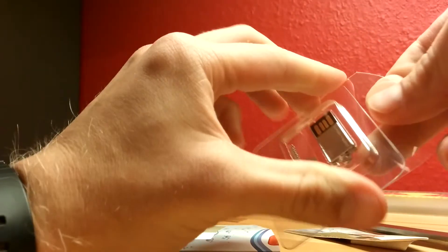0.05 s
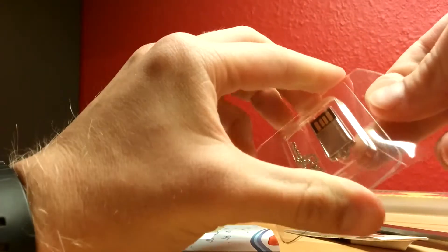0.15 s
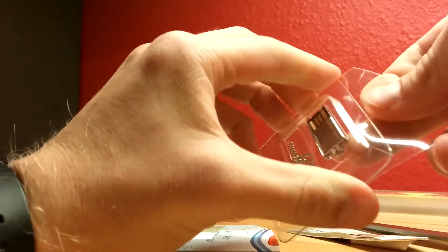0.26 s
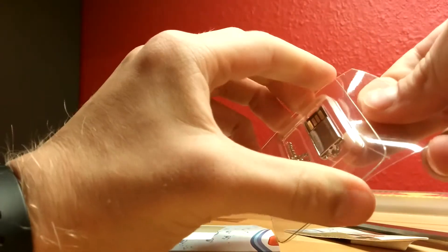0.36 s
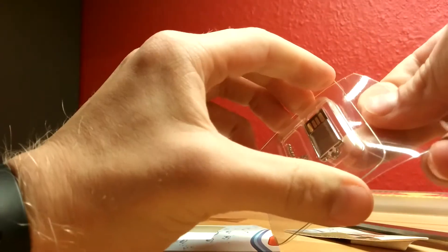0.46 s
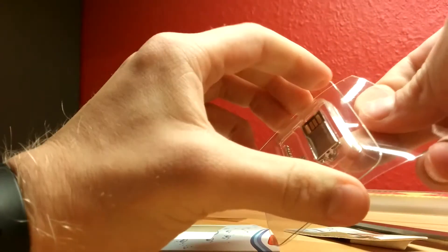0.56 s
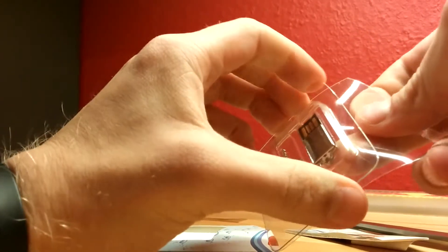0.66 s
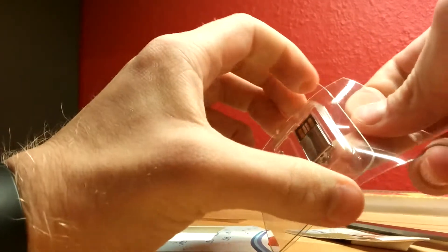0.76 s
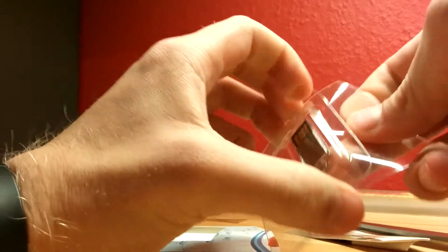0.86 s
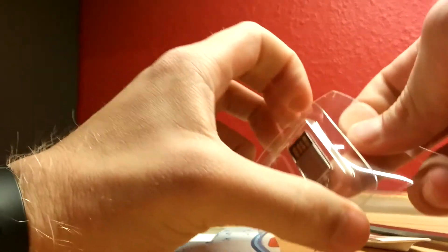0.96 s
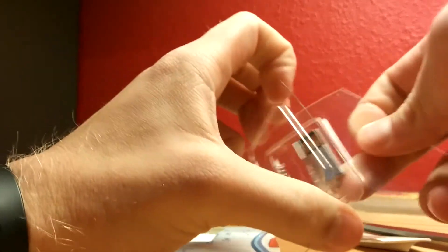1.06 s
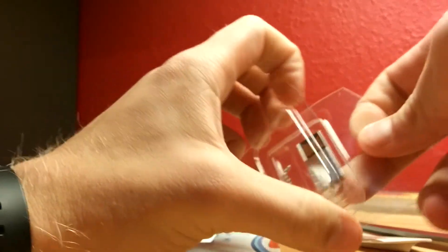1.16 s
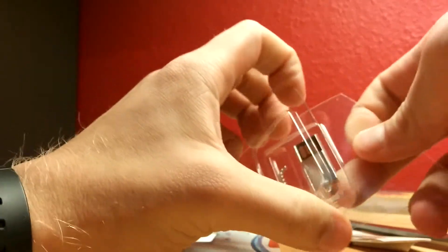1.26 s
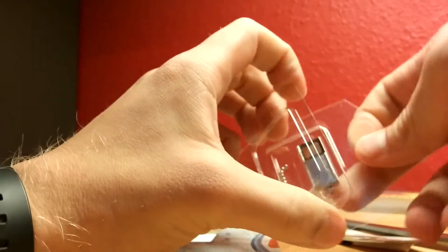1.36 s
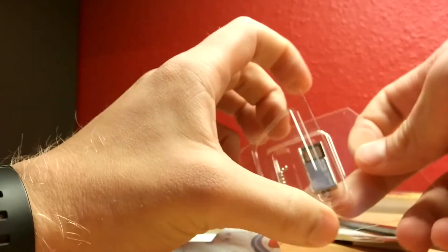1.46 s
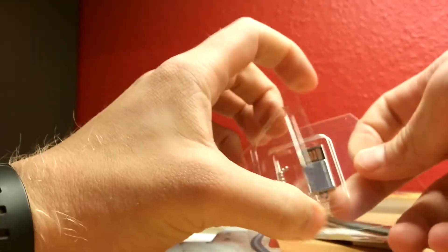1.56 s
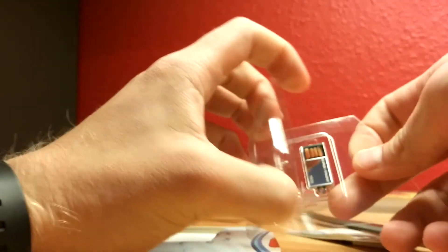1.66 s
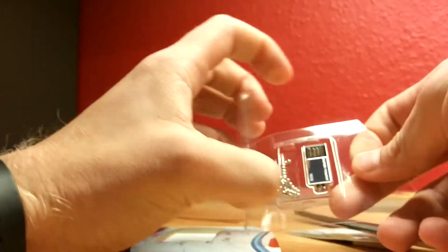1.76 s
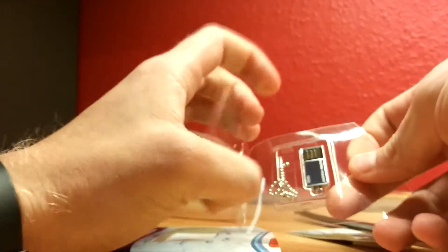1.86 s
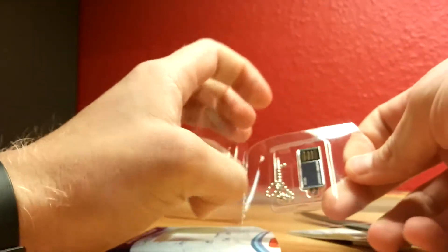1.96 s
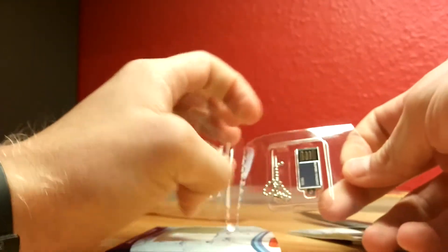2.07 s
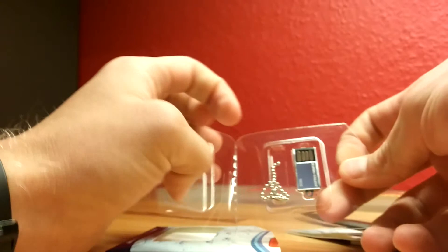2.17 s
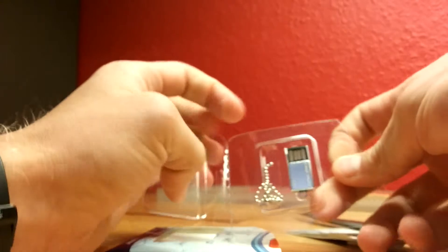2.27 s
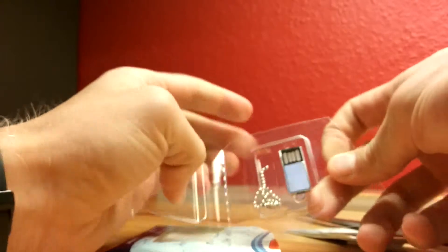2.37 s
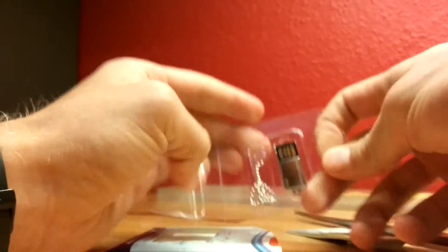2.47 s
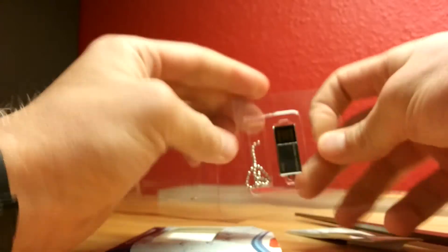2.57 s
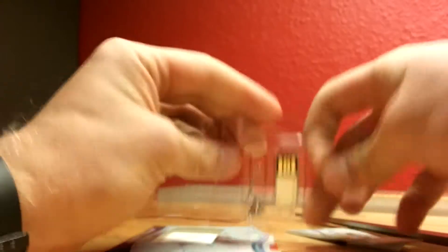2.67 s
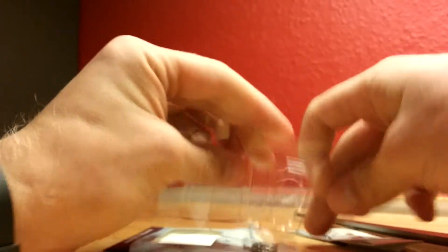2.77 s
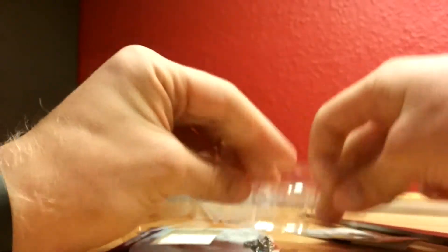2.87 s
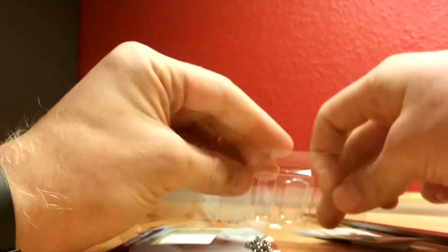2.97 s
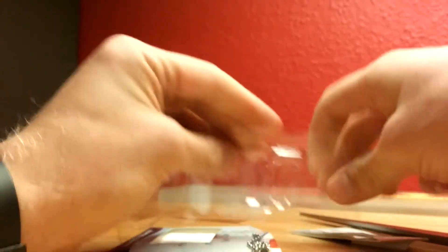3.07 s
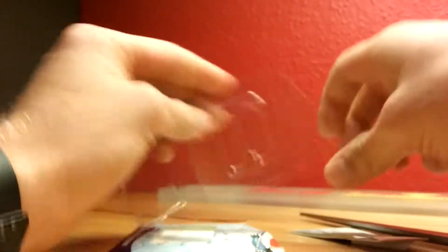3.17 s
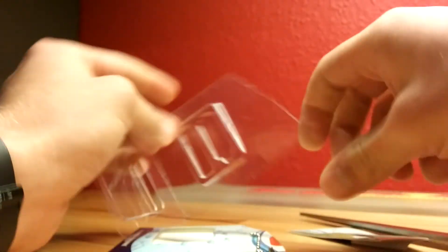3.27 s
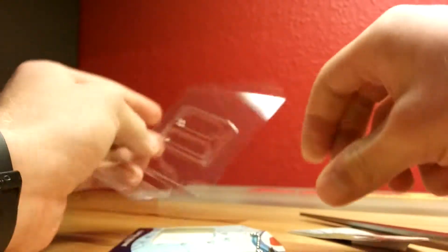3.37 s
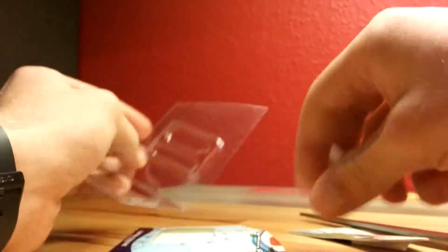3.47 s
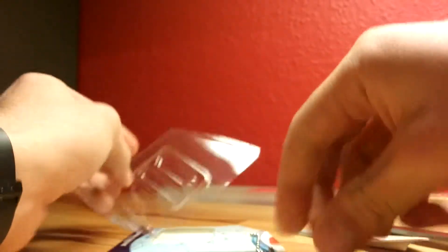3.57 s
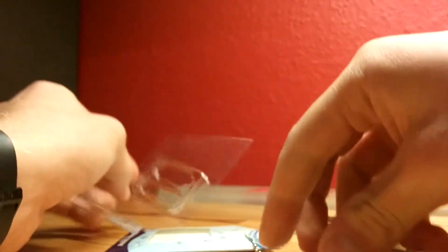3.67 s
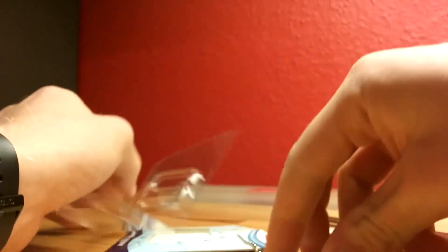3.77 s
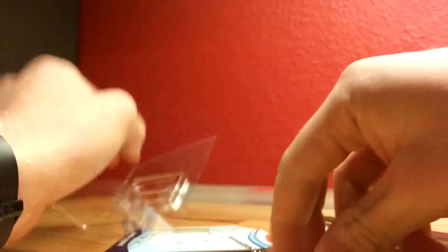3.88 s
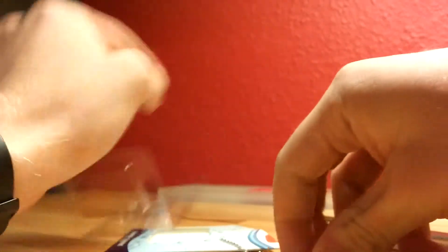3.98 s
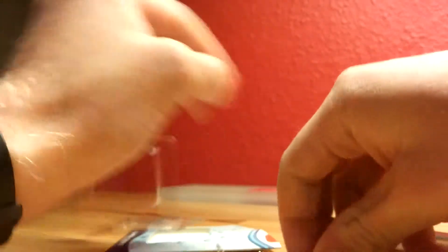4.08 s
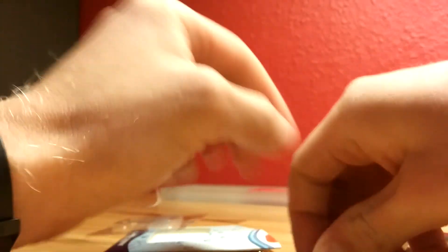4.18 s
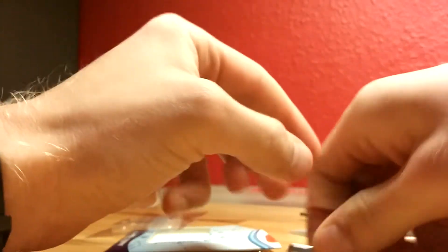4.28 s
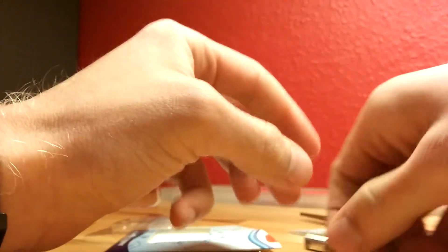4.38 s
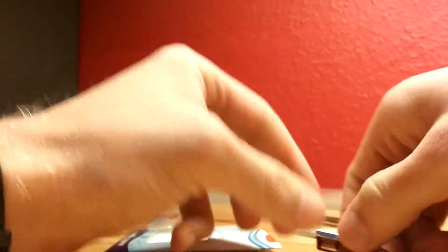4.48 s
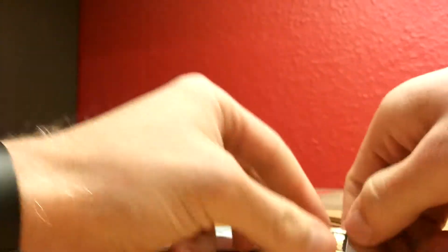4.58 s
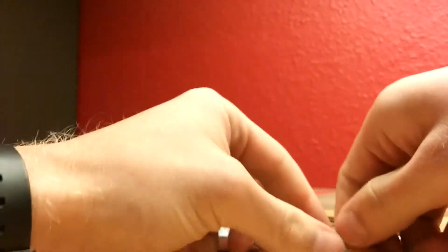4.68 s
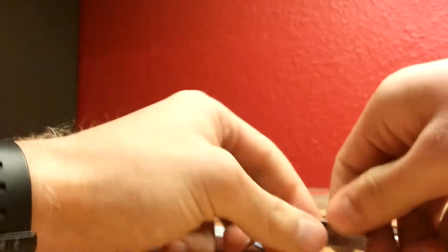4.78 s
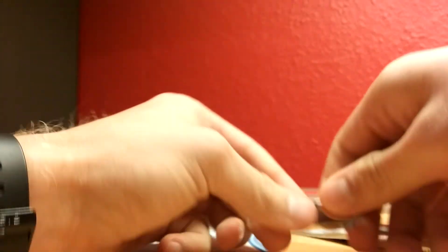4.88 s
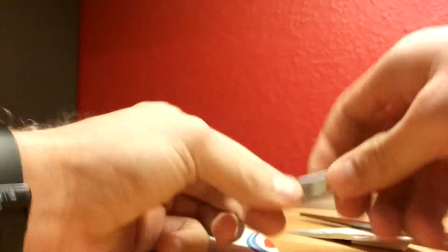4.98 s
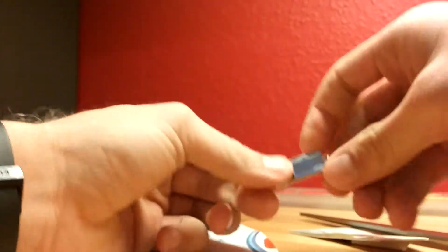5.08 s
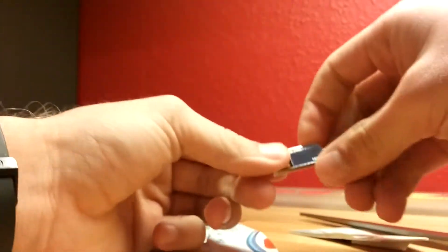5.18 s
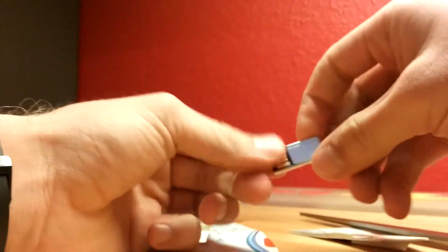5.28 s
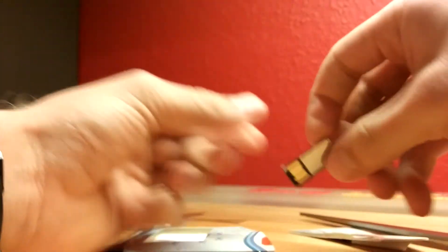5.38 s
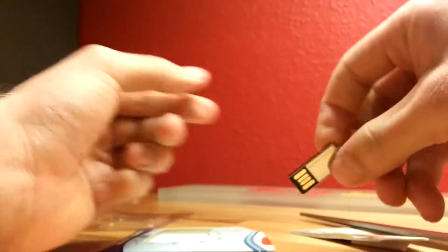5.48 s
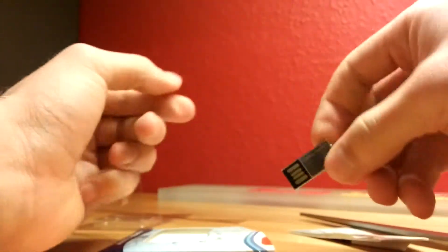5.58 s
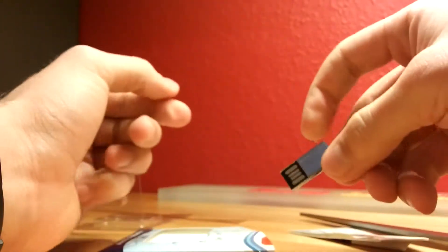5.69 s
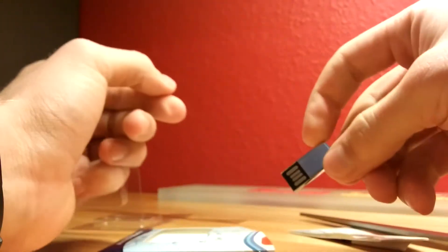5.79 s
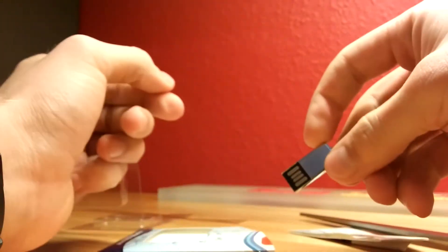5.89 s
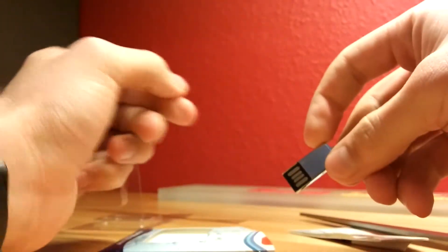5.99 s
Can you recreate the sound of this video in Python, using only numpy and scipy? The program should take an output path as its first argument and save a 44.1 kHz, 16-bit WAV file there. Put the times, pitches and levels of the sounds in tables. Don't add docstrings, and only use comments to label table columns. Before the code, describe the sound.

Close, dry plastic creaks and cracks build to a loud ripping burst, a small part rattles in the tray, then sparse rustles and clicks.

```python
import sys
import numpy as np
from scipy import signal
from scipy.fft import rfft, irfft
from scipy.io import wavfile
from scipy.ndimage import uniform_filter1d

SR = 44100
rng = np.random.default_rng(int(sys.argv[2]) if len(sys.argv) > 2 else 0)


def invert_db(x):
    u = np.asarray(x, float) / 20
    return 10 ** u


def digitize_waveform(pressure):
    field = np.atleast_2d(pressure).T
    bounded = np.clip(field, -1, 1)
    quanta = np.round(bounded * 32767).astype(np.int16)
    wavfile.write(sys.argv[1], SR, quanta)


N = 266229


def curve(points, column=1):
    rows = np.array(points, float)
    return np.interp(np.arange(N) / SR, rows[:, 0], rows[:, column])


def frequencies(size):
    return np.maximum(np.arange(size // 2 + 1) * SR / size, 1)


def colour(x, points):
    hz, db = np.transpose(points)
    shape_db = np.interp(np.log(frequencies(N)), np.log(hz), db, left=-90, right=-90)
    y = irfft(rfft(x) * invert_db(shape_db), N)
    return y / np.std(y)


def resonance(f, hz, q):
    return 1 / (1 + 1j * q * (f / hz - hz / f))


def dying(t, t60):
    return np.exp(-np.log(1000) * t / t60)


def grains(rate, spread_db, smear_s, wash):
    chance = rng.random((N, 2))
    size_db = spread_db * np.minimum(-np.log(chance[:, 1] + 1e-9), 2)
    slips = (chance[:, 0] < rate / SR) * invert_db(size_db)
    puffs = signal.lfilter([1], [1, -np.exp(-1 / (smear_s * SR))], slips)
    return rng.standard_normal(N) * (wash + puffs / np.std(puffs))


def rumble():
    drone = resonance(frequencies(N), 44.4, 5) ** 2
    y = irfft(rfft(rng.standard_normal(N)) * drone, N)
    return y / np.std(y) * invert_db(-78.5)


# (frequency [Hz], level [dB])
HISS_TONE = [(22, -32.5), (45, -11.5), (100, -13.5), (140, -17.5), (400, -21), (4000, -29), (12000, -30.5),
             (16000, -32)]


def hiss(open_db):
    return colour(rng.standard_normal(N), HISS_TONE) * invert_db(-70.5 + 0.77 * open_db)


# (time [s], level [dB])
HUM = [(0, -75), (.5, -76.5), (.95, -79.5), (1.1, -86.5), (4.4, -84), (5.05, -78), (5.3, -74), (5.5, -68.5),
       (5.72, -65.5), (5.8, -53.5), (5.86, -40), (5.92, -64.5), (6.04, -83)]


def hum():
    return np.sin(2 * np.pi * 101.5 * np.arange(N) / SR) * invert_db(curve(HUM))


GATE_SHUT_DB, GATE_RANGE_DB = -69.5, 24.5


def gate_db():
    hum_db = curve(HUM) - 7.5
    loudest_db = np.maximum(np.maximum(*grips()), hum_db)
    return np.clip(loudest_db - GATE_SHUT_DB, 0, GATE_RANGE_DB)


def room(x):
    t = np.arange(SR // 2) / SR
    tail = rng.standard_normal(len(t)) * dying(t, 0.27) * (1 - np.exp(-t / 0.00014))
    tail = signal.lfilter([1], [1, -.35], tail)
    return signal.fftconvolve(x, tail / np.linalg.norm(tail))[:N] * invert_db(-11)


DIE_AWAY_S = [.165, 1.249, 1.304, 1.72, 2.09, 2.358, 2.53, 3.466, 3.814, 4.211, 5.621, 5.885]
DIE_AWAY_MS = 29
GATE_KNEE_DB, GATE_RATIO, SILENT_DB = -54, 1.4, -84


def squeeze_db(rows):
    ms = np.arange(0, N / SR * 1000, .25)
    db = np.full(len(ms), -200.)
    for s, peak_db, rise_ms, fall_ms in rows:
        die_away_s = min((end for end in DIE_AWAY_S if end > s), default=N / SR)
        late = ms - s * 1000
        free = np.maximum(ms - 1000 * die_away_s, 0)
        drop_db = 10 * np.maximum(late / fall_ms, -late / rise_ms) + 10 * free / DIE_AWAY_MS
        db = np.maximum(db, peak_db - drop_db)
    below_knee_db = np.maximum(GATE_KNEE_DB - db, 0)
    passed_db = np.maximum(db - (GATE_RATIO - 1) * below_knee_db, SILENT_DB)
    return np.interp(np.arange(N) / SR * 1000, ms, passed_db)


# (peak time [s], crackle level [dB],
# flexing over crackle [dB], rise [ms per 10 dB], fall [ms per 10 dB])
SQUEEZES = [(0, -38.5, -8, 7.5, 19), (.06, -35, -1.5, 6, 28), (.086, -36, -3, 6, 56),
            (1.107, -18.5, -17, 5.5, 63), (1.203, -25, -4.5, 32, 27), (1.297, -50, 3, 28, 22),
            (1.459, -34.5, -12.5, 3, 11), (1.572, -48.5, 1, 10.5, 19), (1.666, -43.5, 2.5, 6, 49),
            (1.698, -37, 4, 20, 16), (1.812, -35.5, 4.5, 21, 11), (1.888, -35, 3.5, 14, 32),
            (1.928, -30.5, 5, 31.5, 73), (2.209, -24, -9, 4, 19), (2.269, -37, 14, 7.5, 5),
            (2.315, -25.5, -4, 25, 18), (2.446, -51.5, 2.5, 7.5, 40), (2.478, -50.5, 4, 20, 39),
            (2.572, -44, -4, 8.5, 14), (2.596, -43.5, -3.5, 22, 18), (2.674, -24, 7, 7.5, 9),
            (2.7, -26.5, -0.5, 18, 18),
            (2.777, -30, 4, 38, 9), (2.806, -15, -5.5, 16.5, 16), (2.852, -17, -16.5, 16, 43.5),
           (2.891, -16, 6, 6, 40.5), (2.973, -10, -1, 14, 33.5), (3.029, -16.5, 2.5, 12.5, 20.5),
           (3.099, -24.5, 6.5, 36, 63), (3.169, -29, 3, 68, 28), (3.237, -28, -2.5, 42, 91),
           (3.323, -38, 4.5, 38.5, 40), (3.377, -31, -8, 40, 48), (3.418, -31, 2, 28, 19.5),
           (3.694, -40, -7.5, 0.5, 62), (3.733, -22.5, -16, 8.5, 12.5), (3.777, -35.5, -5, 50, 67),
           (3.811, -46, -8, 62, 29), (3.917, -55, -6, 6.5, 58), (3.958, -40.5, 5.5, 10, 60),
           (4.005, -32.5, 7.5, 23, 36.5), (4.119, -45, 2, 82, 60), (4.191, -32, -4, 77, 36),
           (4.278, -58, 8.5, 12, 12),
            (1.657, -54, -3, 6.5, 60), (1.745, -52, 7.5, 42, 19), (1.772, -53, 8, 6, 40),
           (1.858, -56, 0, 4, 80), (3.868, -58, -4, 3, 101), (3.912, -51, 2, 3.5, 100),
           (3.952, -46, -4, 5, 70), (5.492, -36.5, 1, 4, 15), (5.529, -33, -7, 6.5, 40),
           (5.543, -33.5, -5, 12, 66), (5.603, -48, -6, 60, 28), (5.657, -61, -3, 12, 25)]


def grips():
    rows = SQUEEZES
    crackle_rows = [(s, db, rise, fall) for s, db, _, rise, fall in rows]
    flex_rows = [(s, db + flex_db, rise, fall) for s, db, flex_db, rise, fall in rows]
    return squeeze_db(crackle_rows), squeeze_db(flex_rows)


# (frequency [Hz], level [dB per Hz])
CRACKLE_TONE = [(1800, -27.5), (2500, 0), (3400, 2.5), (4300, 3), (5300, -5), (6200, -31.5)]
# (frequency [Hz], level [dB per Hz])
FLEX_TONE = [(300, -30.5), (450, 0), (700, -3.5), (1400, -2), (2300, -5.5), (3200, -25.5)]
# (frequency [Hz], level [dB per Hz])
BUMP_TONE = [(25, -24.5), (45, 4), (100, -1.5), (200, -5), (380, -7.5), (550, -32.5)]
# (frequency [Hz], level [dB per Hz])
EDGE_TONE = [(4500, -30.5), (5800, -1.5), (8000, 2), (10500, -3.5), (13000, -4.5), (15600, -12)]
# (time [s], level [dB])
SHAKES = [(0.073, -43), (1.1, -35.5), (1.667, -37), (1.8, -42), (1.9, -26.5), (1.96, -31), (2.04, -42),
          (2.209, -44), (2.268, -28.5), (2.445, -45), (2.572, -48), (2.658, -39), (2.776, -32.5),
          (2.9, -25.5), (2.95, -28), (3.24, -33), (3.325, -31), (3.36, -33), (3.42, -32), (3.47, -38),
          (4.0, -37), (4.13, -38.5), (4.19, -46), (5.543, -40)]
SHAKE_RISE_MS, SHAKE_FALL_MS = 12, 42


def handling():
    crackle_db, flex_db = grips()
    crackle_db, flex_db = crackle_db - 4, flex_db - 5
    shakes_db = squeeze_db([(s, db, SHAKE_RISE_MS, SHAKE_FALL_MS) for s, db in SHAKES])
    bump_db = np.clip(shakes_db, flex_db - 9.5, flex_db + 6.5)
    edges_db = crackle_db - 6.5 + 0.57 * (crackle_db - flex_db)
    slips = grains(700, 4, .0015, .9)
    edges = colour(slips, EDGE_TONE) * invert_db(edges_db)
    crackle = colour(slips, CRACKLE_TONE) * invert_db(crackle_db + 1.5)
    flex = colour(grains(400, 4, .003, .9), FLEX_TONE) * invert_db(flex_db + 2)
    bump = colour(grains(54, 2.8, 0.023, 0.78), BUMP_TONE) * invert_db(bump_db)
    return crackle + edges + flex + bump


# (time [s], level [dB], pitch [Hz])
BEADS = [
    (2.8816, -4.5, 10200),
    (2.888, -6, 10300),
    (2.9127, -3.5, 10200),
    (2.923, -9, 9900),
    (2.9685, -12, 9800),
    (3.0212, -16, 10300),
    (3.0485, -25.5, 10000),
    (3.095, -20.5, 10000),
]


def beads(size=1024):
    out, t = np.zeros(N), np.arange(size) / SR
    f = frequencies(size)
    for (s, db, hz), puff in zip(BEADS, rng.standard_normal((len(BEADS), size))):
        ring = irfft(rfft(puff * dying(t, .012)) * resonance(f, hz, 14), size)
        out[int(s * SR):][:size] += invert_db(db) * ring / np.abs(ring).max()
    return out


# (time [s], level [dB], panel ring [Hz], fizz [dB], t60 [s])
CRACKS = [(.0788, -6.5, 2800, 1, 0.022), (.1122, -25.5, 3385, -12.5, .062), (1.1018, -8, 3325, -1, 0.023),
          (1.1504, -15.5, 3260, 8.5, .019), (1.1662, -12, 2730, -7, .016), (1.177, -30.5, 3220, 20, .027),
          (1.212, -17.5, 2740, 6.5, 0.014), (1.456, -34, 4770, 7.5, .03), (1.6921, -28.5, 2460, -32, .022),
          (2.3118, -19, 970, -0.5, .035), (2.5871, -33, 2787, 6, .013), (2.7976, -12, 1342, 10, .013),
          (2.8035, -12.5, 1148, -9, .018), (2.8335, -8, 4660, -5, .061), (2.8601, -4.5, 4603, 2, .067),
          (2.9658, -7.5, 3970, -3.5, .028), (2.9899, -4.5, 3992, -9.5, .011),
          (3.2287, -31, 3430, -23, .074), (3.2352, -20, 4440, -25, .05), (3.6848, -24.5, 4500, -9, .106)]
# (time [s], level [dB], panel ring [Hz], fizz [dB], t60 [s])
CREASES = [(1.1092, -9, 3350, -15.5, 0.038), (1.2319, -28.5, 6900, 8, .024), (1.449, -33.5, 3410, -3, 0.04),
           (1.8844, -35, 963, -13, 0.0091), (1.9791, -31.5, 920, -20, 0.016),
           (2.1974, -29, 1120, -10.5, 0.056), (2.2147, -15.5, 4510, 5, 0.029),
           (2.3098, -28, 1110, -6, .071), (2.4391, -45.5, 1410, -15, .016), (2.5138, -47.5, 918, -11, .052),
           (2.5946, -30, 3387, -12, .012), (2.679, -30, 530, -25, .03), (2.779, -18, 1329, -4, .021),
           (2.788, -14.5, 2760, -8, .016), (2.8517, -26, 4548, -12, .06), (2.9155, -3, 1200, -8.5, .047),
           (3.2419, -21.5, 3410, -8.5, 0.17), (3.275, -17, 4270, -14, 0.019),
           (3.3004, -18.5, 4240, -14, 0.03), (3.73, -15, 4550, -7, 0.056), (5.5352, -22, 2650, -10, 0.036),
           (5.604, -32, 4810, -0.5, 0.057)]
# (time [s], level [dB], panel ring [Hz], fizz [dB], t60 [s])
KNOCKS = [(0.055, -27.5, 2730, -1.5, 0.031), (1.0945, -25.5, 1530, -13, 0.03),
          (1.126, -12, 3200, -4, 0.032), (1.1953, -16, 2800, -1, 0.043), (1.7693, -44, 282, -15, 0.029),
          (1.7904, -27.5, 2380, -15, 0.023), (1.8129, -26, 1420, -12.5, 0.04),
          (1.8575, -53.5, 2140, -16.5, 0.06), (1.9525, -30, 253, -5, 0.12),
          (2.0103, -36.5, 3850, -22, 0.038), (2.2616, -21.5, 1340, -11, 0.043),
          (2.47, -46, 820, -23, 0.082), (2.5654, -44.5, 864.4, 0, 0.033), (2.666, -22, 1360, -20, 0.029),
          (2.6934, -30.5, 312.3, -14, .092), (2.748, -30.5, 690, -14, .041),
          (2.7615, -27.5, 312, -12, .041), (2.8819, 0, 3772, -7, 0.06), (3.2125, -21.5, 3600, -9.5, 0.05),
          (3.255, -30, 295, 9, .049), (3.368, -31, 4500, -2, 0.2), (3.4121, -12.5, 1890, -5, 0.021),
          (3.694, -31, 4810, -13, 0.02), (5.4846, -35.5, 3160, -0.5, 0.081)]
# (time [s], level [dB], panel ring [Hz], fizz [dB], t60 [s])
SETTLES = [
    (3.95, -36.5, 1350, -16, 0.1),
    (3.9637, -30, 624, -42, 0.13),
    (3.9975, -35, 1490, -40, 0.42),
    (4.09, -40, 4560, -16, 0.081),
    (4.1212, -21, 2600, -8, 0.096),
    (4.15, -31, 4200, -50, 0.15),
    (4.18, -33.5, 4040, -30, 0.096),
    (4.1912, -29.5, 4230, -31, 0.044),
]
# (time [s], level [dB])
BOUNCES = [
    (3.0205, -16),
    (3.0253, -4),
    (3.0643, -9),
    (3.0886, -18),
    (3.0955, -14),
    (3.0995, -32),
    (3.121, -15),
    (3.142, -25),
    (3.1595, -25.5),
]
BOUNCE_HZ, BOUNCE_FIZZ_DB, BOUNCE_T60_S = 3600, -13.5, 0.028
# (time [s], level [dB], panel ring [Hz])
TICKS = [
    (0.2425, -54, 2750),
    (0.4731, -59.5, 3060),
    (0.949, -60, 2470),
    (1.3577, -56, 3460),
    (1.5568, -52, 2150),
    (3.864, -55, 4300),
    (3.886, -52, 1590),
    (4.2696, -47, 4200),
    (4.3123, -55, 4140),
    (4.39, -64, 3496),
]
TICK_FIZZ_DB, TICK_T60_S = -6, 0.052
# (time [s], level [dB], panel ring [Hz], t60 [s])
THUMPS = [
    (1.8978, -39.5, 364, 0.014),
    (1.928, -31, 388, 0.017),
    (1.9664, -31, 2660, 0.037),
    (2.453, -47.5, 940, 0.074),
    (2.7397, -48, 1361, 0.058),
    (3.3164, -19, 330, 0.012),
    (3.435, -36, 420, 0.13),
    (4.699, -66, 90, 0.055),
]
THUMP_FIZZ_DB = -12
# (time [s], level [dB],
# panel ring [Hz], fizz [dB], t60 [s])
TEARS = [(2.8651, -8, 4420, -1.5, 0.053), (2.871, -9, 7290, -5.5, 0.071), (2.8885, -6, 746, -9, 0.064),
         (2.8965, -11.5, 5260, -11.5, 0.072), (2.9066, -11, 1460, -14, 0.046),
         (2.9119, -4, 1255, -1.5, 0.032), (2.9234, -8.5, 1300, -4.5, 0.045), (2.956, -15.5, 990, -11, .012),
         (2.9694, -1.5, 4346, -3.5, 0.026), (2.973, -7, 800, -11, .04), (2.997, -14, 7900, -9, .03),
         (1.139, -17, 3260, -4, 0.054), (.0792, -10.5, 5310, -6.5, 0.024), (1.0996, -15, 2520, -6, 0.013),
         (3.2293, -27.5, 7040, -18, .12), (3.257, -25, 10100, -6, .03), (3.4146, -16.5, 4700, -8, 0.015),
         (3.438, -33, 10900, -8, .02)]
THUD_DB = -28.5, -15, -3, -3, -18.5, -4.5, 14, -15.5


def snap_rows():
    bounces = [(s, db, BOUNCE_HZ, BOUNCE_FIZZ_DB, BOUNCE_T60_S) for s, db in BOUNCES]
    ticks = [(*row, TICK_FIZZ_DB, TICK_T60_S) for row in TICKS]
    thumps = [(s, db, hz, THUMP_FIZZ_DB, t60) for s, db, hz, t60 in THUMPS]
    kinds = CRACKS, CREASES, KNOCKS, SETTLES, bounces, ticks, thumps, TEARS
    return [(s, db, hz, thud_db, fizz_db, t60)
            for rows, thud_db in zip(kinds, THUD_DB) for s, db, hz, fizz_db, t60 in rows]


def slip_burst(puff, t, t60):
    burst = puff * (1 - np.exp(-t / (.0002 + .008 * t60))) * dying(t, max(t60 * .9, .004))
    burst = burst + 1.2 * puff * np.exp(-t / 0.00061)
    slips = rfft(burst)
    return slips / uniform_filter1d(np.abs(slips) ** 2, size=70) ** .5


def shell_body(f, panels):
    others = sum(invert_db(-6 * strength) * resonance(f, 800 * 7.5 ** pitch, 13) for pitch, strength in panels)
    return invert_db(-6.0) * others + invert_db(-10.5) * resonance(f, 4300, 4.5) + invert_db(-19.5) * resonance(f, 1000, 0.39)


def snaps(size=8192, count=22):
    out, t = np.zeros(N + size), np.arange(size) / SR
    f = frequencies(size)
    push = rfft(t * np.exp(-t / .00015))
    fade = np.cos(np.pi / 2 * t / t[-1])
    rows = snap_rows()
    noise, chance = rng.standard_normal((len(rows), size)), rng.random((len(rows), count, 2))
    for (s, db, hz, thud_db, fizz_db, t60), puff, panels in zip(rows, noise, chance):
        slips = slip_burst(puff, t, t60)
        panel = resonance(f, hz, 6 + hz / 250 * (db > -45))
        desk = resonance(f, min(hz, 320 if thud_db > 5 else 170), 0.67) ** 2
        edges = resonance(f, 11000, 0.75) ** 2 / (1 + (f / 13500) ** 6)
        layers = [(slips * panel, -3.5), (slips * shell_body(f, panels), -1.5),
                  (push * desk, thud_db - 7.0), (slips * edges, fizz_db - 1.5)]
        if 3.0 < s < 3.17:
            tray = resonance(f, 688, 21) + invert_db(-6) * resonance(f, 310, 12)
            layers.append((push * tray, -5 - .25 * db))
        at = int(s * SR)
        for spectrum, share_db in layers:
            ring = irfft(spectrum, size) * fade
            loudest = uniform_filter1d(ring ** 2, size=100).max() ** .5
            out[at:at + size] += invert_db(db + share_db - 2.5) * ring / loudest
    return out[:N]


def scene():
    near, open_db = snaps() + beads(), gate_db()
    tail = room(near) * invert_db(open_db - GATE_RANGE_DB)
    drone = rumble() * invert_db(0.74 * open_db)
    return (near + handling() + tail + hiss(open_db) + hum() + drone)[None]


def band_limit(x):
    return signal.sosfilt(signal.butter(12, 16820, fs=SR, output="sos"), x)


def record(dry):
    rounded = np.tanh(0.7 * dry) / 1.006
    top_cut = signal.ellip(10, .2, 75, 15900, fs=SR, output="sos")
    bass_cut = signal.butter(2, 40, "high", fs=SR, output="sos")
    return band_limit(signal.sosfilt(np.vstack([top_cut, bass_cut]), rounded))


dry = scene()
out = record(dry)
digitize_waveform(out)
```